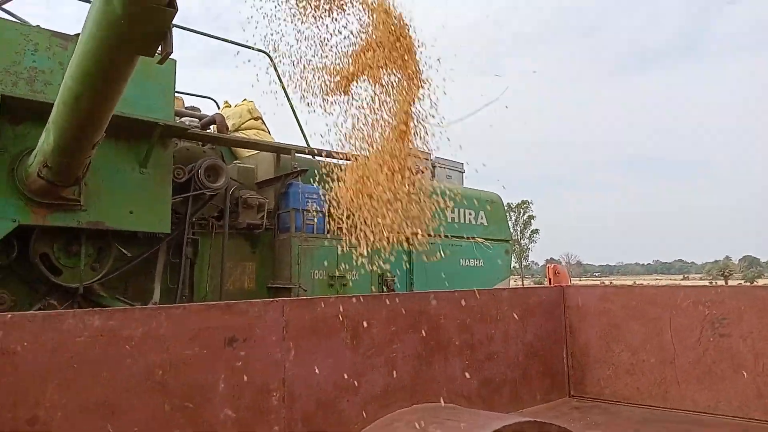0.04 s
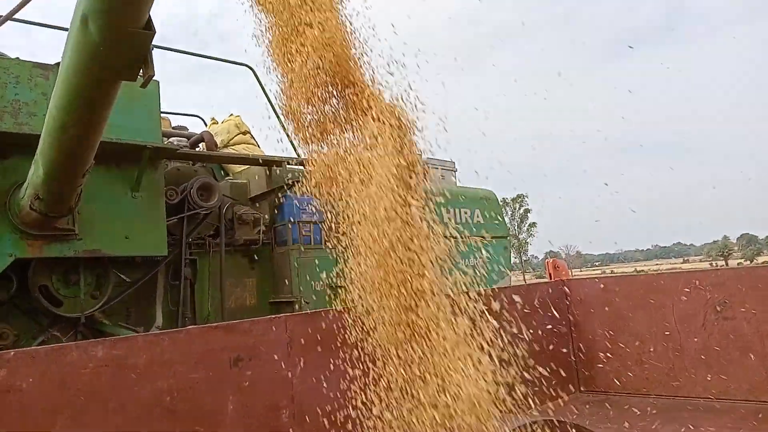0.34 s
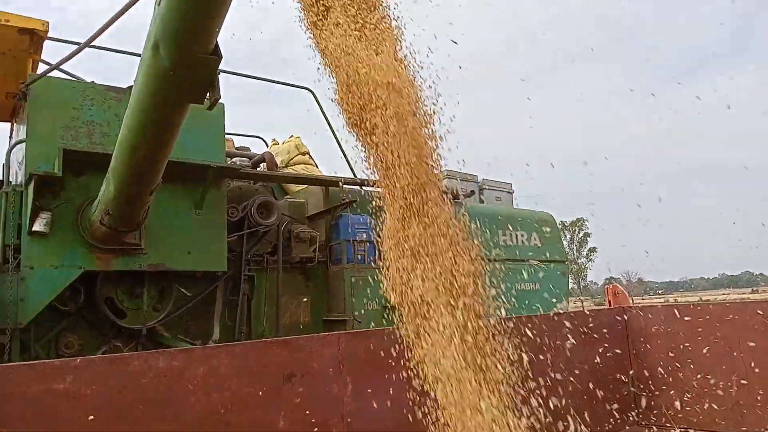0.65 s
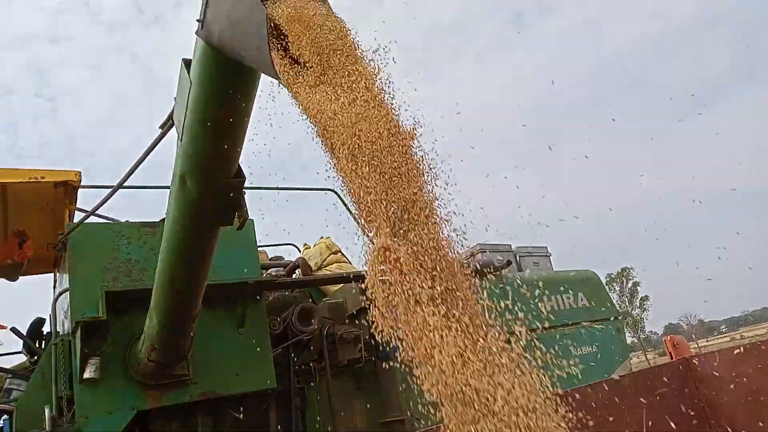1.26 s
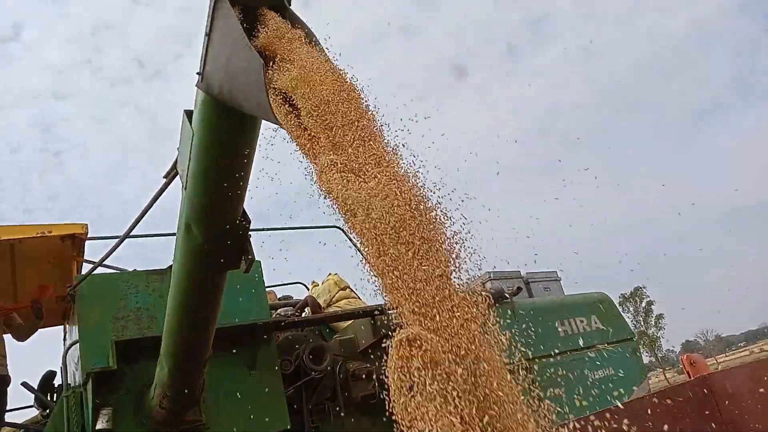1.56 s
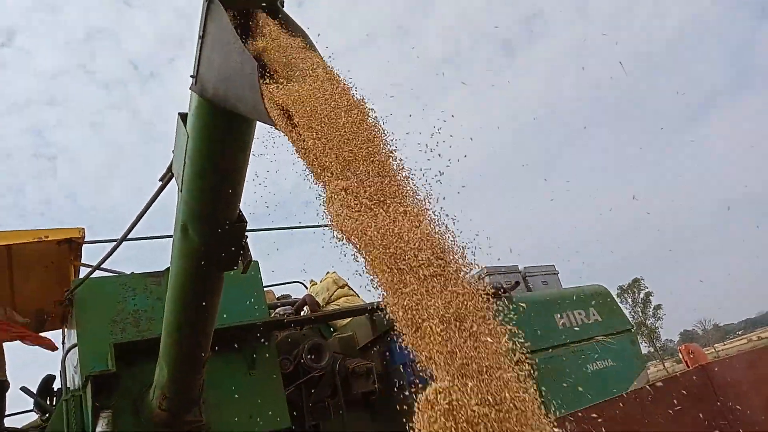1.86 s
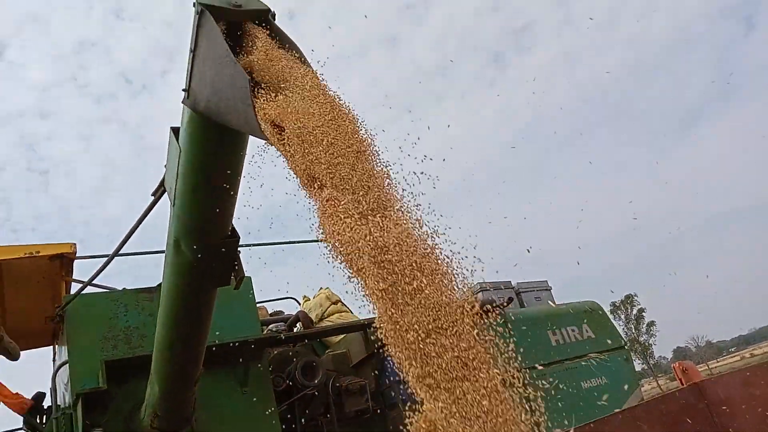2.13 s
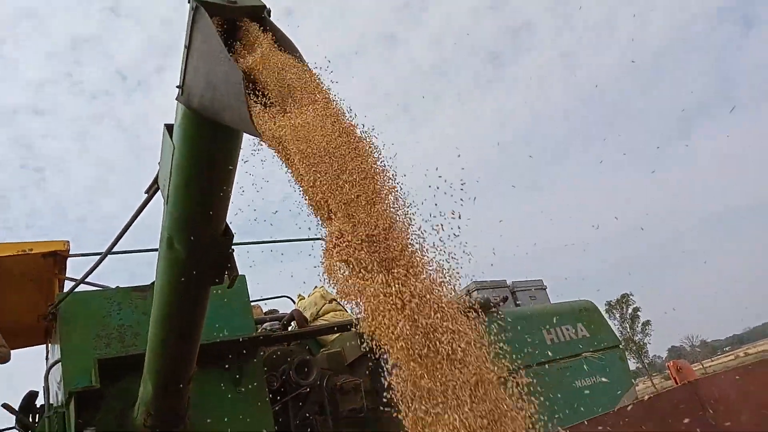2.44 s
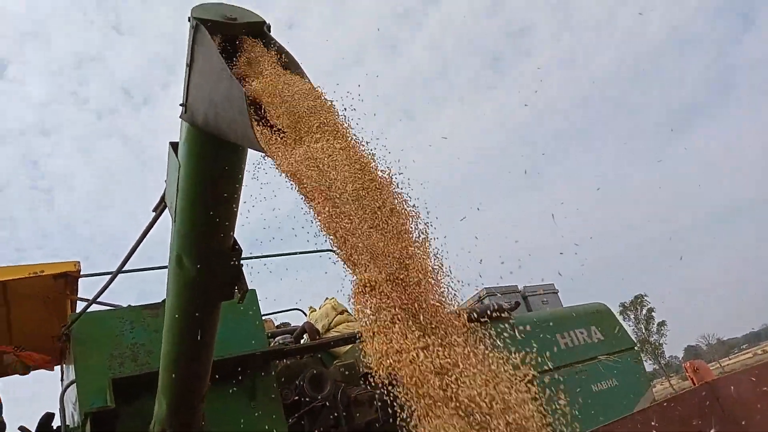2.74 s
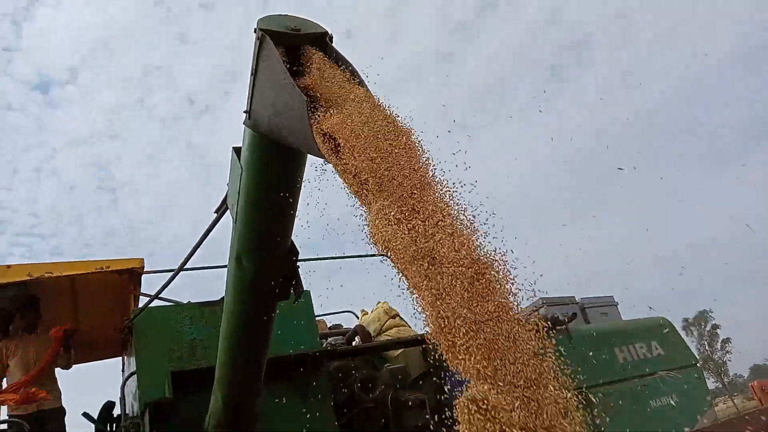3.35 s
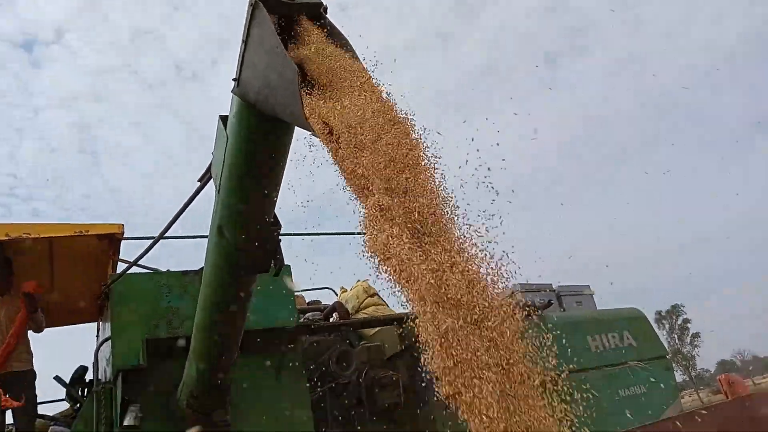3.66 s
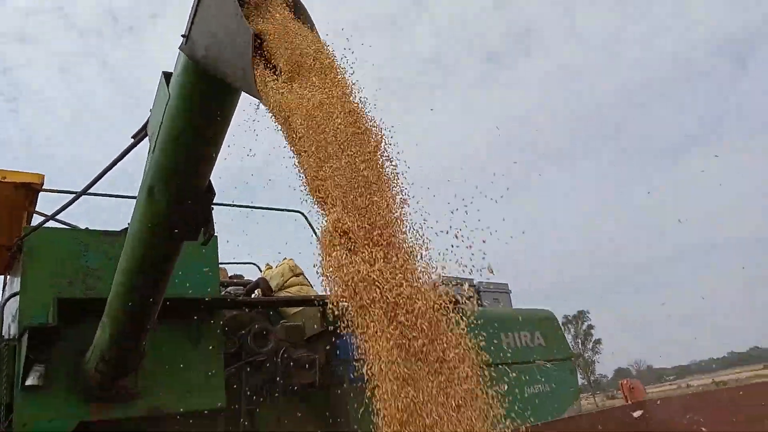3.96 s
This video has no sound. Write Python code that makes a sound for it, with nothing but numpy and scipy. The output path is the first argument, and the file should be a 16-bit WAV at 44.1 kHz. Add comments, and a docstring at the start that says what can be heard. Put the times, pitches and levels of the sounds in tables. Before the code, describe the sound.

A combine harvester runs close by in the open air for all four seconds, a loud, rough, wavering whine above diesel clatter and low rumble. A soft thump comes near 0.2 seconds. From about 0.3 seconds grain pours onto a bare steel trailer floor in a bright patter, dulling to a steady hiss after about one second as it heaps up. Metal squeaks briefly near two seconds.

```python
"""An open field, where a combine harvester unloads grain into a steel trailer.
Up front is the loud, wavering howl of the running machinery: a whine in a rough resonant band.
A six-cylinder diesel clatters underneath. After a soft thump the grain hits the bare trailer floor,
thousands of tiny impacts that dull to a hiss as a heap builds up. Metal rubs on metal in one squeak."""
import sys
import numpy as np
from scipy import signal
from scipy.fft import rfft, irfft
from scipy.io import wavfile
from scipy.ndimage import uniform_filter1d

SR = 44100
rng = np.random.default_rng(int(sys.argv[2]) if len(sys.argv) > 2 else 0)


def file_out(sig):
    """Save sig as 16-bit WAV at sys.argv[1]."""
    # one column per channel
    cols = np.atleast_2d(sig).T
    # limit, then scale
    lim = np.clip(cols, -1, 1)
    pcm = np.round(lim * 32767).astype(np.int16)
    wavfile.write(sys.argv[1], SR, pcm)


N = 176400
TIME = np.arange(N) / SR

# fader on the howl's whines and rough band: t/s, gain/dB
HOWL_FADER = [(0, -21), (.3, -21.5), (.38, -19), (.49, -18.5), (.53, -25), (.59, -17.5), (.72, -19),
              (.95, -17.5), (1.15, -18), (1.32, -18.5), (1.44, -18), (1.56, -16), (1.61, -25.5),
              (1.66, -16.5), (1.78, -21), (1.98, -20), (2.1, -18.5), (2.23, -17), (2.27, -21),
              (2.48, -20.5), (2.55, -17), (2.85, -21), (2.97, -23), (3.12, -18.5), (3.25, -18.5),
              (3.48, -22.5), (3.57, -20.5), (3.72, -21), (3.85, -23), (4, -18)]
# shape of the rough band round the whine: f/Hz, relative level/dB
HOWL_BAND = [(300, -68), (560, -33), (650, -21), (675, -10), (690, -7), (722, 3.5), (755, -2), (788, -3),
             (810, -11.5), (860, -16), (920, -43), (1050, -52)]
# pitch of the main whine: t/s, f/Hz
WHINE_PITCH = [(0, 758), (.4, 766.4), (1.1, 766.1), (1.45, 767.2), (2.5, 766), (2.7, 765), (3.55, 765.4),
               (3.85, 763.3), (4, 764)]
# clean tones in the howl: offset from the main whine/Hz, relative level/dB
WHINES = [(0, -3), (-52.5, -13), (58, -18.5), (83.5, -21.5)]
# how far those tones stand out of the howl: t/s, gain/dB
WHINE_FOCUS = [(0, -3.5), (.3, -4.5), (.45, -1.5), (1, 1), (1.4, -1.5), (2.05, 0.5), (2.4, -2), (2.7, 1),
               (3.1, 0.5), (3.4, -2), (3.9, 5)]
# the whine's octave: t/s, level/dB
OCTAVE_LEVEL = [(0, -45), (.33, -33.5), (.44, -38), (.59, -34.5), (.9, -50), (4, -51)]

# Each grain layer has a fader (t/s, gain/dB) and a spectrum (f/Hz, level/dB per Hz).
# bright hits on bare steel
STEEL_FADER = [(0, -13), (.17, -6), (.3, -10.5), (.325, -1), (.355, 4), (.41, -5.5), (.5, -0.5), (.8, -2.5),
               (1.1, -6.5), (1.5, -11), (2.2, -12), (2.75, -18), (2.85, -7.5), (2.95, -26), (3.8, -32),
               (3.96, -9)]
STEEL_SPECTRUM = [(40, -100), (200, -70), (500, -63), (1100, -69), (1850, -66), (2300, -57.5),
                  (2550, -54.5), (2950, -48.5), (3600, -50.5), (4500, -62), (6000, -65), (8000, -79),
                  (9000, -91), (15500, -90)]
# softer hiss on the growing heap
HEAP_FADER = [(0, -8), (.29, -15), (.33, 0.5), (.5, -2), (.8, -0.5), (1.1, -1.5), (1.4, .5), (2, 0),
              (2.8, -0.5), (3.2, -1), (4, -1)]
HEAP_SPECTRUM = [(100, -105), (1000, -77.5), (2600, -62.5), (3800, -62.5), (5200, -68.5), (6500, -91),
                 (7400, -81), (8050, -76.5), (8900, -85), (10000, -86.5), (11500, -85), (13000, -88),
                 (14300, -95), (15700, -94)]
# stray kernels ticking off the near wall
STRAY_FADER = [(0, -27), (.29, -8), (.33, -6), (.5, 3), (.6, -7.5), (1, -5), (1.06, 1), (1.25, -3.5),
               (2, -18), (4, -17)]
STRAY_SPECTRUM = [(1500, -100), (5000, -80), (8000, -75.5), (10000, -84.5), (15500, -84)]

# engine speed: t/s, four-stroke cycle rate/Hz
ENGINE_SPEED = [(0, 13.912), (.6, 13.9), (1.6, 13.9), (2.1, 13.887), (3, 13.888), (4, 13.877)]
# exhaust, shaft and gear tones: multiple of the cycle rate, level/dB
ENGINE_TONES = [(4, -56), (6, -45.5), (7, -51.5), (10, -51), (33, -52), (34, -52), (86, -49.5), (94, -49),
                (99, -50.5), (112, -48.5), (145, -53), (150, -49), (156, -45)]
# knocks that return every cycle: f/Hz, level/dB per Hz
KNOCK_SPECTRUM = [(30, -100), (60, -105), (130, -65), (450, -68.5), (900, -67), (1300, -64.5), (1450, -67),
                  (1530, -61), (1650, -73.5), (1950, -82), (2170, -54.5), (2380, -82.5), (3100, -68),
                  (4500, -72.5), (8000, -119)]
# combustion rattle: f/Hz, level/dB per Hz
RATTLE_SPECTRUM = [(100, -105), (500, -82), (1000, -68), (1550, -65), (1900, -69), (2500, -67),
                   (3100, -59.5), (3900, -62.5), (4700, -72), (5700, -71), (7300, -81.5), (8700, -98),
                   (15500, -117)]
# fader on knocks and rattle together: t/s, gain/dB
CLATTER_FADER = [(0, 1.5), (.8, -1), (1.5, 0), (2.2, -2), (2.9, 0), (3.4, -3), (4, 1)]
# rumble of belts, sieves and panels: f/Hz, level/dB per Hz
RUMBLE_SPECTRUM = [(10, -84), (32, -90), (45, -75), (70, -70), (90, -61), (220, -58.5), (290, -63.5),
                   (460, -60.5), (540, -67.5), (1000, -70), (2000, -71), (6000, -122)]
# colour of the soft thump: f/Hz, relative level/dB
THUMP_SPECTRUM = [(35, -45), (90, -18), (200, 1), (420, 2), (700, -17), (2000, -22), (8000, -57)]
# early reflections off the trailer walls: delay/s, gain
WALL_ECHOES = [(.0031, 0.26), (.0068, 0.26), (0.0114, 0.26)]


def howl(rough_db=-3, whine_flutter=.13, octave_flutter=.81):
    """Running machinery: a whine and side tones swell with a rough band; an octave flickers on top."""
    band = colour(rng.standard_normal(N), HOWL_BAND)
    band_rms = np.sqrt(uniform_filter1d(band ** 2, int(.13 * SR)))
    body = from_db(rough_db) * band / band_rms  # ironing out slow swells leaves the roughness
    turns = np.cumsum(in_time(WHINE_PITCH)) / SR
    for offset_hz, db in WHINES:
        phase = 2 * np.pi * (turns + offset_hz * TIME + rng.random()) + .19 * drift(1.5)
        whine = sine(phase, db + in_time(WHINE_FOCUS))
        body += whine * (1 + whine_flutter * drift(15))
    octave = sine(2 * np.pi * 2 * turns, in_time(OCTAVE_LEVEL))
    octave *= 1 + octave_flutter * drift(25)
    return from_db(in_time(HOWL_FADER)) * body + octave


def grain(kernels_per_s=14000, strays_per_s=2600, surge_db=.84):
    """The surging stream lands on steel at first, then more and more on grain; stray kernels ricochet."""
    on_steel = kernels(STEEL_FADER, STEEL_SPECTRUM, kernels_per_s)
    on_heap = kernels(HEAP_FADER, HEAP_SPECTRUM, kernels_per_s)
    surge = from_db(surge_db * drift(12))
    strays = kernels(STRAY_FADER, STRAY_SPECTRUM, strays_per_s)
    return trailer_walls(surge * (on_steel + on_heap) + strays)


def kernels(fader, spectrum, per_s, spread_db=2.5):
    """A patter of tiny impacts of uneven size, coloured by the surface they hit."""
    sizes = from_db(spread_db * np.minimum(rng.exponential(1, N), 5))
    polarity = rng.choice([-1, 1], N)
    hits = rng.random(N) < per_s / SR
    return from_db(in_time(fader)) * colour(sizes * polarity * hits, spectrum)


def diesel(cylinders=6, imbalance_db=1.4, firing_depth=.18, tone_waver=.36):
    """Knocks and rattle pulse with each firing, over wavering exhaust, shaft and gear tones."""
    cycles = np.cumsum(in_time(ENGINE_SPEED)) / SR
    firings = cycles * cylinders
    knocks = knock_loop(cycles)
    punch = from_db(imbalance_db * rms_one(rng.standard_normal(cylinders)))  # one per cylinder
    accent = np.interp(firings, np.arange(cylinders), punch / punch.mean(), period=cylinders)
    pulse = accent * (1 + firing_depth * np.cos(2 * np.pi * firings))
    rattle = trailer_walls(colour(rng.standard_normal(N), RATTLE_SPECTRUM))
    clatter = from_db(in_time(CLATTER_FADER)) * pulse * (knocks + rattle)
    tones = np.zeros(N)
    for multiple, db in ENGINE_TONES:
        phase = 2 * np.pi * (multiple * cycles + rng.random())
        tones += sine(phase, db) * (1 + tone_waver * drift(5.6))
    return clatter + tones


def knock_loop(cycles, size=8192, top_hz=15750):
    """The diesel's knocks: one cycle of coloured noise, looped in step with the engine."""
    cycle_hz = ENGINE_SPEED[1][1]
    hz = np.arange(size // 2 + 1) * cycle_hz
    harmonics = from_db(at_hz(KNOCK_SPECTRUM, hz)) * np.exp(2j * np.pi * rng.random(len(hz)))
    one_cycle = irfft(harmonics * (hz < top_hz)) * size * np.sqrt(cycle_hz / 2)
    return np.interp(cycles * size, np.arange(size), one_cycle, period=size)


def squeak(start_s=1.932, length_s=.099, start_hz=3690, rise_hz=433, rise_s=.049, jitter=.0199, rasp=.53):
    """Metal rubs on metal: a raspy tone bends up and levels off, its overtones opening as it swells."""
    age = np.clip(TIME - start_s, 0, length_s)
    swell = np.sqrt(np.abs(np.sin(np.pi * age / length_s)))
    hz = start_hz + rise_hz * (1 - np.exp(-age / rise_s))
    hz *= 1 + jitter * drift(510)
    phase = 2 * np.pi * np.cumsum(hz) / SR
    tone = sum(swell ** (2 * k - 1) * sine(k * phase, db) for k, db in enumerate([-24, -45.5, -43], 1))
    return tone * (1 + rasp * drift(200))


def thump(start_s=.166, t60_s=.17, gain_db=-51):
    """One dull knock, a fast-dying burst of noise just before the main stream lands."""
    age = TIME - start_s
    decay = (age > 0) * from_db(gain_db - 60 * np.abs(age) / t60_s)
    return decay * colour(rng.standard_normal(N), THUMP_SPECTRUM)


def rumble():
    """Belts, sieves and panels lay down a steady bed of low noise."""
    return colour(rng.standard_normal(N), RUMBLE_SPECTRUM)


def trailer_walls(x, sway_s=.00012):
    """Add short wall reflections; their delays drift a little, giving a slow phasing."""
    return x + sum(gain * np.interp(TIME - delay - sway_s * drift(.75), TIME, x, left=0)
                   for delay, gain in WALL_ECHOES)


def from_db(db):
    """Decibels to gain."""
    return 10 ** (np.asarray(db) / 20)


def sine(phase, db):
    """A pure tone at an rms level in dB."""
    return from_db(db) * np.sqrt(2) * np.sin(phase)


def rms_one(x):
    """Scale to unit rms."""
    return x / np.sqrt(np.mean(x ** 2) + 1e-20)


def in_time(rows):
    """An automation curve: straight lines through rows of t/s, value."""
    return np.interp(TIME, *np.transpose(rows))


def at_hz(spectrum, hz):
    """Read a spectrum's dB on a log-frequency axis."""
    f, db = np.transpose(spectrum)
    return np.interp(np.log(np.maximum(hz, 1)), np.log(f), db)


def colour(x, spectrum):
    """EQ a white signal to a spectrum in dB per Hz."""
    hz = np.arange(N // 2 + 1) * SR / N
    return irfft(rfft(rms_one(x)) * from_db(at_hz(spectrum, hz)) * np.sqrt(SR / 2), N)


def drift(rate_hz):
    """Random modulation of unit rms, mostly slower than rate_hz."""
    hz = np.arange(N // 2 + 1) * SR / N
    return rms_one(irfft(rfft(rng.standard_normal(N)) / (1 + (hz / rate_hz) ** 2), N))


def scene():
    """Machine and grain, close by in the open air, mixed to mono."""
    return (diesel() + rumble() + howl() + grain() + thump() + squeak())[None]


def record(dry):
    """A steep high cut takes off the very top."""
    high_cut = signal.ellip(12, .1, 90, 15750, fs=SR, output="sos")
    return signal.sosfilt(high_cut, dry)


dry = scene()
out = record(dry)
file_out(out)
```